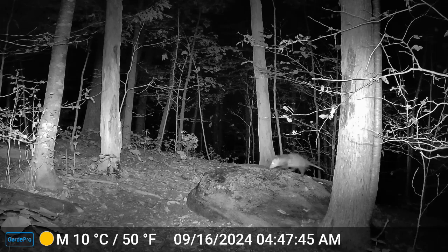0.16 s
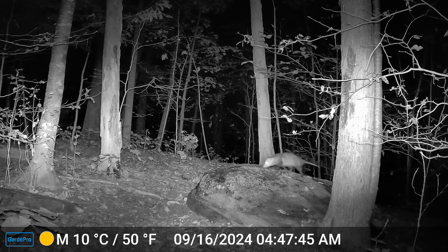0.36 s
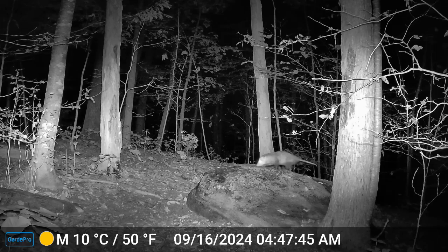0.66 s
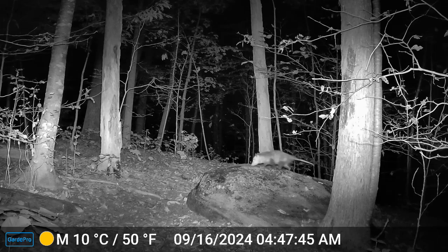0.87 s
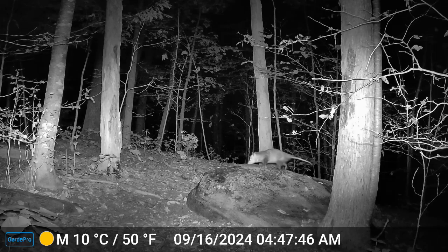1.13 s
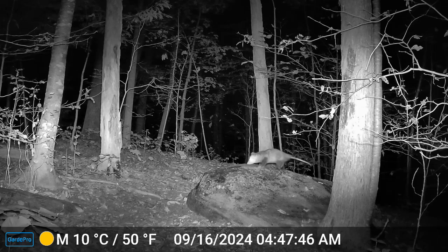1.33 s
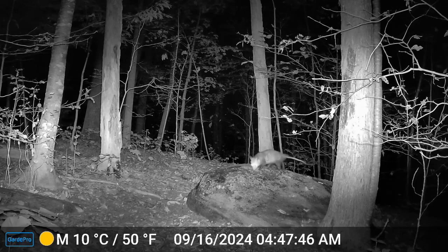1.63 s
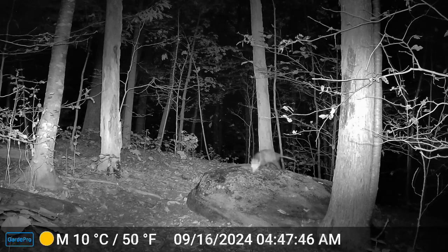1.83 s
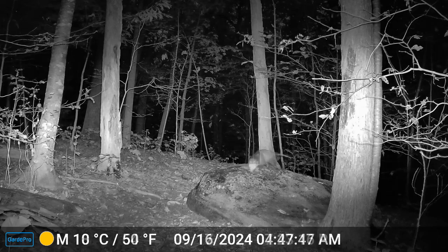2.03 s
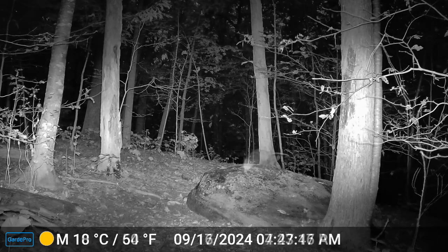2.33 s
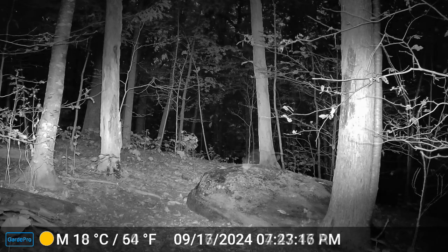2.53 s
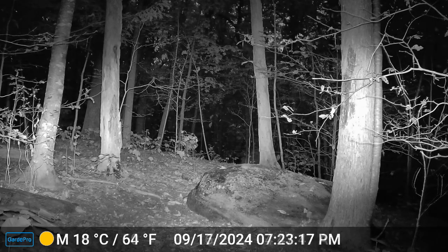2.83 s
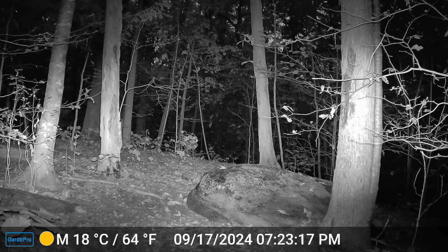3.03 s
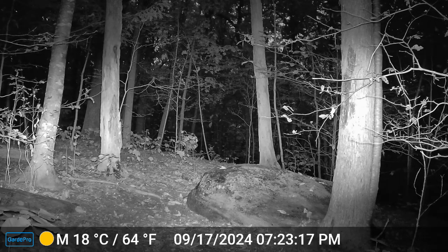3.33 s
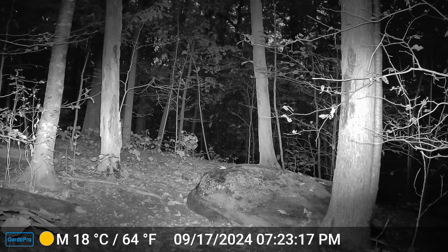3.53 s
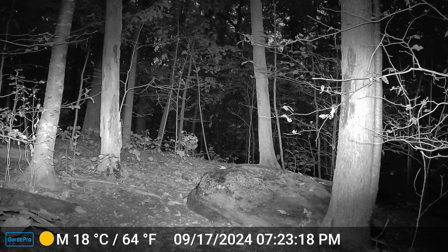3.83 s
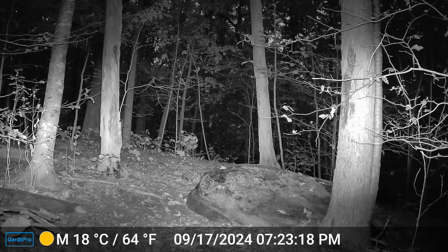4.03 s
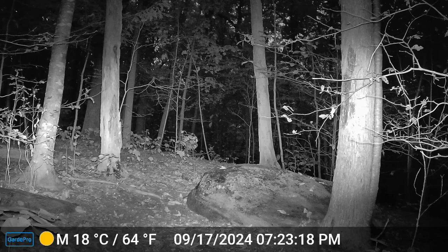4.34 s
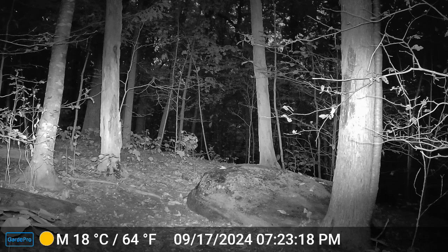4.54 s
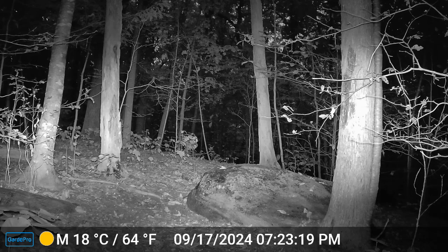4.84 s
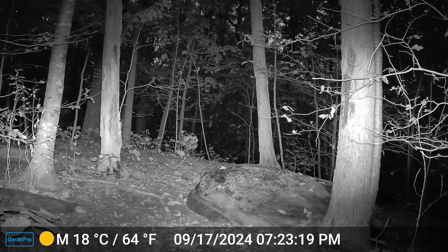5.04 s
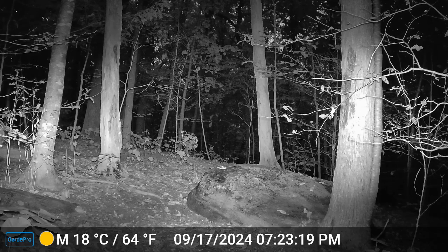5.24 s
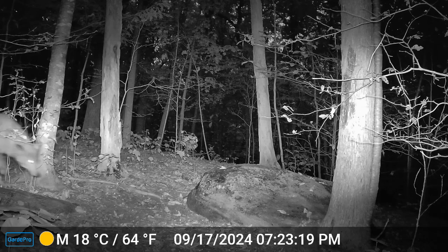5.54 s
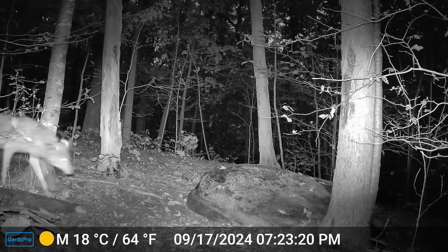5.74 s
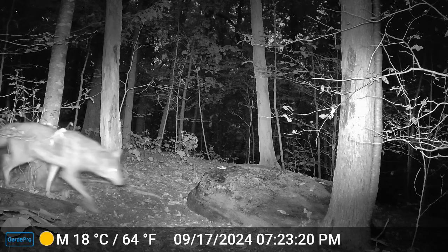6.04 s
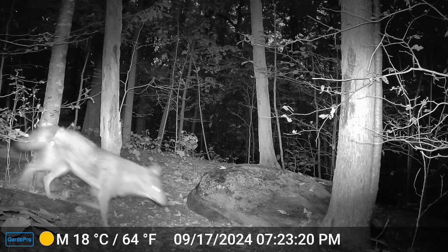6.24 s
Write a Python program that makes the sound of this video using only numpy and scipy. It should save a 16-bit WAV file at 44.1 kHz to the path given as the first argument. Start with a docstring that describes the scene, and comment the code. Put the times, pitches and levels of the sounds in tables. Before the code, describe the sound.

Distant low rumble and a delicate, fast cricket trill open quietly, with barely audible chirps. Before two seconds a broad, shimmering chorus of many crickets enters and stays to the end, swelling and sinking. Light stick knocks come midway; then an approaching deer crunches leaves and snaps a twig. Open forest with very short echoes from trunks, captured in mono by a small fixed microphone.

```python
"""A woodland at night: a thin, cool-night cricket trill over the rumble of distant traffic, a drone that dies away.
Soft far chirps, of swelling sines, and knocks on sticks, of short noise, come before the trill fades.
The loud chorus of a warmer evening takes over, of noise beaten by wing strokes, under a fine high hiss.
A faint hum wavers in the middle. An animal's paws crush leaves, in tiny clicks, and knock on more sticks;
near the end a twig snaps, as ringing modes, amid the last leaves."""
import sys
import numpy as np
from scipy import signal
from scipy.fft import rfft, irfft, next_fast_len
from scipy.io import wavfile

SR = 44100
rng = np.random.default_rng(int(sys.argv[2]) if len(sys.argv) > 2 else 0)


def unload_audio(sound):
    """Save the sound as a 16-bit wav file, at the path given as the first command line argument."""
    columns = np.transpose(np.atleast_2d(sound))
    # keep every value between -1 and 1, then stretch to whole-number steps
    steps = np.round(np.clip(columns, -1, 1) * 32767)
    wavfile.write(sys.argv[1], SR, steps.astype(np.int16))


N = 281799

# the cool night starts to fade as the warm evening comes in
FADE_S, FADE_LENGTH_S = 1.765, 0.92


def gain_of(db):
    """Amplitude factor of a level in dB."""
    return 10 ** (np.asarray(db) / 20)


def noise(count=N):
    """White noise, the raw material of most layers."""
    return rng.standard_normal(count)


def evened(x):
    """Scales x to rms 1."""
    return x / np.sqrt(np.mean(x ** 2) + 1e-20)


def curves(rows):
    """Columns of a time table, drawn as straight lines through every sample."""
    s, *columns = np.transpose(rows)
    return [np.interp(np.arange(N) / SR, s, column) for column in columns]


def coloured(x, points):
    """Filters x by a spectrum of (frequency [Hz], relative level [dB]), to rms 1."""
    size = next_fast_len(len(x))
    f, db = np.transpose(points)
    log_hz = np.log(np.fft.rfftfreq(size, 1 / SR) + 1)
    shape_db = np.interp(log_hz, np.log(f + 1), db)
    filtered = irfft(rfft(x, size) * gain_of(shape_db), size)
    return evened(filtered[:len(x)])


def add(mix, s, sound):
    """Lays a sound into the mix at s seconds, cut at the end of the mix."""
    part = mix[round(s * SR):][:len(sound)]
    part += sound[:len(part)]


def window(start, length, edge):
    """Rises to 1, holds, and falls back to 0."""
    fall = max(start + length - edge, start + edge)
    corners = [start, start + edge, fall, start + length + 1e-3]
    return np.interp(np.arange(N) / SR, corners, [0, 1, 1, 0])


def fades():
    """Gains of the cool night and of the warm evening."""
    # the warm evening enters by two steps, swells, drops back and settles: (time [s], level [dB])
    warm_level = [(1.755, -60), (1.775, -14.5), (1.87, -11), (1.89, -5.5), (2.05, -2), (2.25, 0.5),
                  (2.54, 3), (2.575, -2.5), (2.9, -2)]
    gone = np.clip((np.arange(N) / SR - FADE_S) / FADE_LENGTH_S, 0, 1)
    cool = (1 - gone) ** .3  # a power under 1: it lingers, then drops away
    return cool, gain_of(curves(warm_level)[0])


def traffic():
    """Distant traffic: lumpy low noise whose colour crossfades at equal power."""
    # overall level: (time [s], level [dB])
    rumble_level = [(.03, -42), (.2, -39), (.43, -42.5), (.56, -45.5), (.7, -43), (1.05, -44), (1.8, -45.5),
                    (2.06, -44), (2.25, -43.5), (2.5, -40), (2.7, -41), (2.78, -48), (2.88, -34),
                    (2.97, -45.5), (3.08, -39), (3.36, -40), (3.54, -47), (3.7, -42.5), (4.4, -43.5),
                    (4.52, -38), (5.07, -47.5), (5.16, -39), (5.53, -45), (5.6, -37.5), (5.86, -47),
                    (5.95, -40), (6.1, -43.5)]
    # spectra before and after the crossfade: (frequency [Hz], relative level [dB])
    cool_tone = [(12, -57), (20, -26), (41, -3.5), (59, 2), (102, 1.5), (130, -4), (161, -3), (229, -13),
                 (247, -17.5), (300, -21), (390, -40), (660, -120)]
    warm_tone = [(12, -36), (22, -12.5), (50, -1.5), (75, -2.5), (92, 2), (102, -2), (117, -2), (140, -4.5),
                 (160, -8.5), (215, -15), (300, -30), (390, -58), (660, -120)]
    cool, _ = fades()
    # slow noise lets the level also wander by chance, by 0.5 dB rms
    lumps_db = 0.5 * coloured(noise(), [(1, -10), (3, 0), (7, 0), (15, -30)])
    blend = cool * coloured(noise(), cool_tone) + np.sqrt(1 - cool ** 2) * coloured(noise(), warm_tone)
    return gain_of(curves(rumble_level)[0] + lumps_db) * blend


def air():
    """Wash of far insects and leaves: broad noise; the warm one slowly grows."""
    # spectra of the two washes: (frequency [Hz], relative level [dB])
    cool_tone = [(200, -4), (300, -0.5), (500, -6), (900, -8.5), (1500, -13.5), (2700, -15.5),
                 (5200, -21.5), (7400, -27), (8800, -30)]
    warm_tone = [(200, -2.5), (300, 2.5), (500, -3), (900, -2), (1400, -8), (1700, -9.5), (2900, -4.5),
                 (3450, -14), (5500, -15.5), (5900, -26.5), (7400, -31.5), (8800, -31)]
    cool_db, warm_start_db, rise_db_per_s = -57.5, -56.5, 1.12
    cool, warm = fades()
    warm_db = warm_start_db + rise_db_per_s * (np.arange(N) / SR - FADE_S)
    cool_wash = cool * gain_of(cool_db) * coloured(noise(), cool_tone)
    return cool_wash + warm * gain_of(warm_db) * coloured(noise(), warm_tone)


def drone():
    """A low drone passing away: a narrow band of noise that sinks steadily."""
    hz, start_db, fall_db_per_s = 162, -48, 9
    narrow = [(hz * .5, -120), (hz * .92, -8), (hz, 0), (hz * 1.08, -8), (hz * 2, -120)]
    level_db = start_db - fall_db_per_s * np.arange(N) / SR
    return gain_of(level_db) * coloured(noise(), narrow)


def chorus(kind, wing, count=24):
    """Each singer scrapes its wings on its own beat; the summed scrapes ring in the wings of the kind."""
    db, rate, spread, duty, near_db = kind
    t = np.arange(0, N + 32, 32) / SR  # every 32nd sample is enough for the beats
    # the first, nearest singer keeps the exact rate
    beats = rate * (1 + spread * np.r_[0, rng.uniform(-1, 1, count - 1)])
    stroke = (beats[:, None] * t + rng.random((count, 1))) % 1
    sounding = np.minimum(stroke / np.clip(duty, .1, 1), 1)
    power = np.sin(np.pi * sounding) ** 2
    power[0] *= gain_of(2 * near_db)  # doubled, as this is power
    envelope = np.sqrt(np.interp(np.arange(N) / SR, t, power.sum(0)))
    return gain_of(db) * coloured(envelope * noise(), wing)


def cool_trill():
    """The thin trill of the cool night: one kind of cricket with a singer close by."""
    # the kind: (level before the fade [dB], wing strokes [1/s], spread of that rate [share],
    # sounding part of a stroke [share], extra level of the nearest singer [dB])
    cool_kind = (-54, 51, .18, .6, 9)
    # how its wings ring: (frequency [Hz], relative level [dB])
    cool_wing = [(2900, -46), (3250, -14.5), (3500, -6), (3800, -1), (4100, 1), (4350, -7), (4600, -12.5),
                 (5100, -43)]
    return fades()[0] * chorus(cool_kind, cool_wing)


def chirps():
    """Single far chirps: soft sines that swell and die under half a sine."""
    # (time [s], peak level [dB], frequency [Hz])
    blips = [(1.0495, -64, 2950), (1.1762, -66, 3020), (1.2246, -65, 3010), (1.3394, -64, 3030),
             (1.623, -53.5, 635)]
    length_s = 0.039
    out, u = np.zeros(N), np.arange(0, length_s, 1 / SR)
    swell = np.sin(np.pi * u / length_s)
    for s, db, hz in blips:
        add(out, s, gain_of(db) * np.sin(2 * np.pi * hz * u) * swell)
    return out


def stick_knocks():
    """Paws knock on sticks: short dying noise around the pitch of each stick."""
    # (time [s], level before the decay [dB], pitch [Hz], time to sink by 12 dB [s])
    knocks = [(1.254, -55, 1260, .02), (1.509, -58, 1060, .015), (3.8, -46.5, 1310, 0.013),
              (3.935, -48.5, 1265, 0.022), (3.962, -47.5, 1200, 0.018), (4.1116, -53, 1190, 0.027),
              (4.1436, -43.5, 1390, 0.028), (4.41, -56, 1120, 0.019), (5.63, -58, 1060, .016),
              (5.672, -47, 1510, 0.037), (5.698, -48, 1410, 0.021)]
    # spectrum of any stick: (share of its pitch [ratio], relative level [dB])
    stick_tone = [(.3, -60), (.8, -9), (1, 0), (1.15, -8), (2, -60)]
    out, u = np.zeros(N), np.arange(SR // 6) / SR
    for s, db, hz, length in knocks:
        stick = [(hz * share, rel_db) for share, rel_db in stick_tone]
        push = gain_of(db - 12 * u / length) * np.minimum(u / 0.0033, 1)  # 3.3 ms attack
        add(out, s, push * coloured(noise(len(u)), stick))
    return out


def bouts():
    """Swells, in dB, of the upper and of the faint kind as they sing up."""
    # (start [s], length [s], swell of the upper kind [dB], swell of the faint kind [dB])
    bout_rows = [(2.723, 0.53, 7.5, 9), (3.85, 0.3, 0, 5), (4.17, 0.23, 4, 4), (4.35, 0.258, 2.5, 9.5),
                 (5.045, .22, 6, 7), (5.623, 0.66, 6.5, 9)]
    return sum(np.outer(swells, window(s, length, .097)) for s, length, *swells in bout_rows)


def warm_chorus():
    """Six kinds of cricket together; louder singing of the main kind also sits a little higher."""
    # the kinds: (base level [dB], wing strokes [1/s], spread of that rate [share],
    # sounding part of a stroke [share], extra level of the nearest singer [dB])
    main_kind = (-39.5, 48, .28, 1, 0)
    deep_kind = (-42.5, 36, .3, .85, 0)
    thin_kind = (-47, 50, .3, .85, 0)
    high_kind = (-53, 62.5, .1, .36, 10)
    upper_kind = (-47, 38, .3, .5, 1.5)
    faint_kind = (-60, 45, .3, .5, 3)
    # how their wings ring, the main kind before its upward shift: (frequency [Hz], relative level [dB])
    main_wing = [(3200, -50.5), (3550, -18), (3700, -7.5), (3850, 0), (3980, 0), (4045, 3.5), (4110, -1.5),
                 (4200, -4), (4400, -14.5), (4600, -23.5), (4900, -60.5), (6000, -72)]
    deep_wing = [(1600, -47.5), (1780, -21), (1900, -10), (2000, -8), (2130, 0.5), (2350, -1.5),
                 (2450, -14.5), (2600, -54), (5500, -70)]
    thin_wing = [(2350, -39), (2480, -2), (2600, 1), (2700, 0), (2770, -5.5), (2810, -14.5), (2950, -18),
                 (3100, -54.5)]
    high_wing = [(4200, -33.5), (4450, -11), (4800, 2), (5200, -3.5), (5450, -5.5), (5600, -10),
                 (5800, -24), (6100, -50)]
    upper_wing = [(3800, -44), (4100, -6.5), (4280, 2.5), (4450, -6), (4600, -8.5), (4750, -25.5),
                  (5100, -48), (6000, -65)]
    faint_wing = [(2900, -40), (3100, -8), (3270, -6), (3480, -1.5), (3600, -8), (3900, -44)]
    # the main kind swells and sinks, as if singers joined and dropped out: (time [s], level over base [dB])
    main_level = [(1.77, -3), (2.3, 1.5), (2.85, -1), (3.3, 2), (3.75, 2.5), (4, 0), (4.3, 4), (4.65, -2.5),
                  (5.05, 4), (5.45, -0.5), (5.9, 2.5), (6.1, -1), (6.39, 1.5)]
    # the high kind comes in strongly, sinks and recovers: (time [s], level over base [dB])
    high_level = [(1.87, 2), (1.9, 4), (2.15, 0.5), (2.55, 0), (3, 2.6), (5.4, 2.4), (5.8, 3.2),
                  (6.39, 1.5)]
    rise_hz_per_db, pull_hz_per_db = 11.5, 5  # pitch pull of the main kind's own and the upper kind's swells
    main_db, (upper_db, faint_db) = curves(main_level)[0], bouts()
    shift_hz = rise_hz_per_db * main_db + pull_hz_per_db * upper_db
    shift = np.exp(2j * np.pi * np.cumsum(shift_hz) / SR)
    # turning the analytic signal moves all its frequencies by the same number of Hz
    analytic = signal.hilbert(chorus(main_kind, main_wing), next_fast_len(N))[:N]
    singing = gain_of(main_db) * (analytic * shift).real
    singing += gain_of(2) * chorus(deep_kind, deep_wing)
    singing += gain_of(2) * chorus(thin_kind, thin_wing)
    singing += gain_of(curves(high_level)[0]) * chorus(high_kind, high_wing)
    singing += gain_of(upper_db) * chorus(upper_kind, upper_wing)
    singing += gain_of(faint_db - 3) * chorus(faint_kind, faint_wing)
    return fades()[1] * singing


def shimmer():
    """A fine hiss high above the warm chorus: treble noise with a moving level."""
    # (time [s], level [dB])
    shimmer_level = [(1.76, -90), (1.88, -69), (2.3, -69), (2.4, -75), (2.55, -75), (2.75, -71),
                     (2.85, -67), (3.2, -68), (3.4, -70.5), (4.1, -68), (4.55, -67), (4.8, -69.5),
                     (5.4, -70.5), (5.8, -68)]
    # spectrum: (frequency [Hz], relative level [dB])
    shimmer_tone = [(5300, -30), (5800, 1), (6500, 2), (7300, -5), (8800, -5.5)]
    return gain_of(curves(shimmer_level)[0]) * coloured(noise(), shimmer_tone)


def hum():
    """A faint far hum: one sine that sags in pitch and wavers in level."""
    start_s, length_s, start_hz, sag_hz_per_s, level_db = 2.5, 2.2, 459, 2, -70
    waver_db = 2.4 * coloured(noise(), [(1, 2.0), (6, -7.5), (15, -35)])
    hz = start_hz - sag_hz_per_s * (np.arange(N) / SR - start_s)
    tone = np.sqrt(2) * np.sin(2 * np.pi * np.cumsum(hz) / SR)  # rms 1
    return window(start_s, length_s, .2) * gain_of(level_db + waver_db) * tone


def leaves():
    """Paws crush dry leaves, slowly or with one snap: clumps of tiny clicks of uneven strength."""
    # (time [s], level before the decay [dB], time to sink by 10 dB [s])
    crunches = [(3.802, -58, .009), (3.963, -52, .01), (4.128, -51, 0.038), (4.4134, -52, .035),
                (5.47, -47, 0.032), (5.4974, -60, 0.037), (5.57, -48, 0.0078), (5.684, -50, .035),
                (5.708, -54, .035), (5.8217, -51.5, .04), (5.8835, -47, 0.011), (6.011, -43, .034),
                (6.047, -38.5, .011), (6.117, -52, .035), (6.156, -57.5, .035), (6.256, -50, .009),
                (6.2811, -48.5, .037)]
    # spectrum of the clicks: (frequency [Hz], relative level [dB])
    leaf_tone = [(2400, -34.5), (2900, 0.5), (3400, 10), (4200, -13.5), (5800, -2), (6300, 1), (7300, -3),
                 (8200, -4), (8800, -6)]
    weight, u = np.zeros(N), np.arange(SR // 6) / SR
    for s, db, length in crunches:
        attack = np.minimum(u / (0.67 * length), 1)
        add(weight, s, gain_of(db - 10.0 * u / length) * attack)
    strength = gain_of(3.8 * np.minimum(rng.exponential(1, N), 5))
    clicks = strength * noise() * (rng.random(N) < .15)  # 15 % of the samples click
    return weight * coloured(clicks, leaf_tone)


def ring(modes):
    """Modes that start softly and die after one blow."""
    t = np.arange(SR // 10) / SR
    ringing = sum(gain_of(db - 60 * t / t60) * np.sin(2 * np.pi * hz * t) for hz, db, t60 in modes)
    return ringing * (1 - np.exp(-t / 0.00038))


def twig_snap():
    """A twig cracks fibre by fibre, each crack ringing its wood; its end hits the ground."""
    # (time [s], level over the modes [dB])
    cracks = [(5.9411, 8), (5.942, -14), (5.9443, -12.5), (5.9472, 2.5)]
    # modes of the twig, then of the ground: (frequency [Hz], level [dB], 60 dB decay time [s])
    twig_modes = [(3000, -32.5, 0.00894), (3330, -30.5, 0.013), (3430, -38, 0.019), (2000, -52, .006),
                  (6570, -37, 0.0074), (7070, -33, 0.0063), (8430, -38.5, 0.0067)]
    ground_modes = [(940, -31, .022), (1070, -32, .02), (1220, -31, .018), (560, -46, .03)]
    out = np.zeros(N)
    for s, db in cracks:
        add(out, s, gain_of(db) * ring(twig_modes))
    add(out, 5.9466, ring(ground_modes))
    return out


def trees(x, t60, wet_db):
    """Trunks and leaves scatter the sound into a short tail of sparse echoes."""
    t = np.arange(SR // 3) / SR
    signs = rng.choice([-1., 1.], len(t))
    taps = signs * (rng.random(len(t)) < .05) * gain_of(-60 * t / t60)
    tail = signal.oaconvolve(x, taps / np.linalg.norm(taps))[:len(x)]
    return x + gain_of(wet_db) * tail


def animal():
    """Knocks, leaves and twig share the echoes of the trees."""
    return trees(stick_knocks() + leaves() + twig_snap(), t60=.08, wet_db=-9)


def scene():
    """All layers in one channel."""
    background = traffic() + air() + drone() + hum()
    insects = cool_trill() + chirps() + warm_chorus() + shimmer()
    return (background + insects + animal())[None]


def record(dry):
    """The small microphone rolls off in the treble; then a band limit and a faint hiss."""
    # microphone treble: (frequency [Hz], level [dB])
    roll_off = [(7400, 0), (8000, -7), (8500, -16), (9000, -28)]
    hz, db = np.transpose(roll_off)
    grid = np.linspace(0, SR / 2, 257)
    microphone = signal.firwin2(255, grid, gain_of(np.interp(grid, hz, db)), fs=SR)
    soft = signal.oaconvolve(dry, microphone[None], "same")
    band_limit = signal.firwin(301, 8823, window=("kaiser", 9), fs=SR)
    cut = signal.oaconvolve(soft, band_limit[None], "same")
    hiss = signal.oaconvolve(noise(), signal.firwin(201, 15500, fs=SR), "same")
    return cut + gain_of(-93.5) * hiss


dry = scene()
out = record(dry)
unload_audio(out)
```